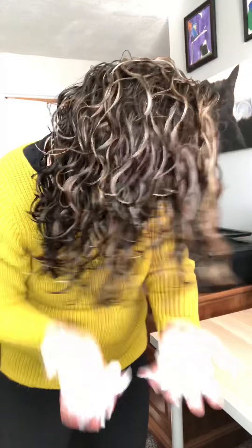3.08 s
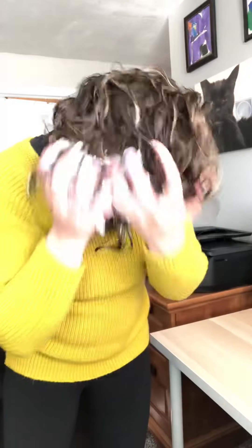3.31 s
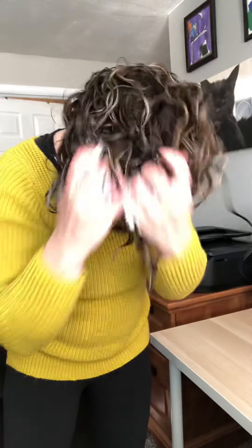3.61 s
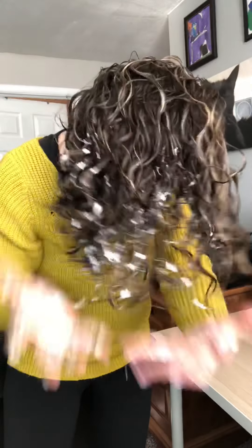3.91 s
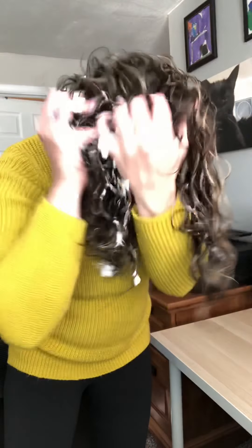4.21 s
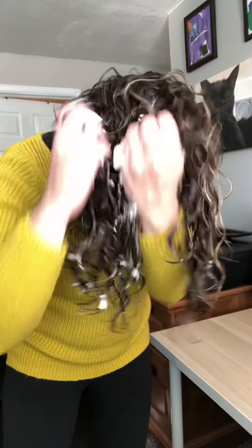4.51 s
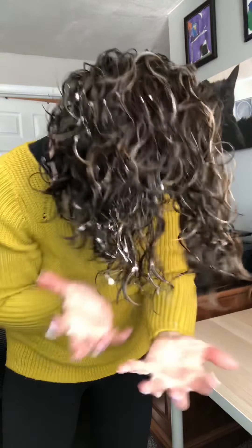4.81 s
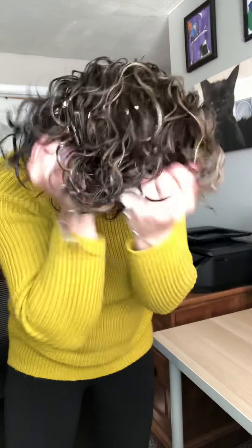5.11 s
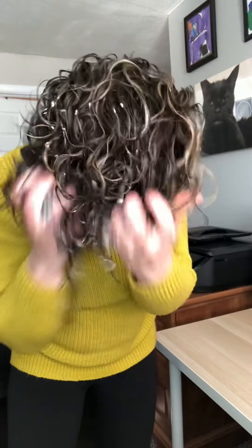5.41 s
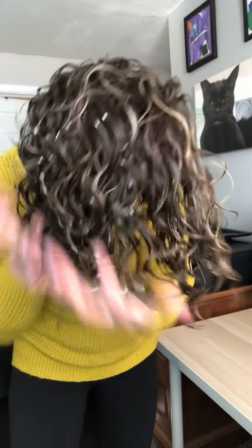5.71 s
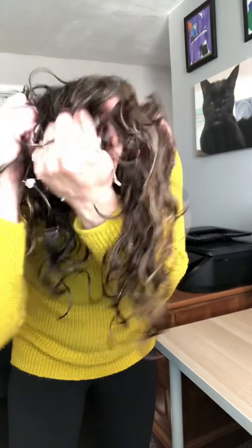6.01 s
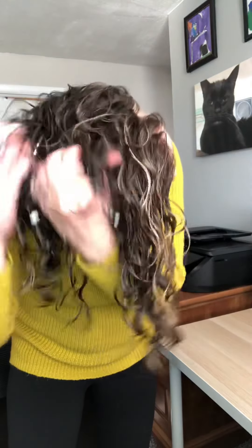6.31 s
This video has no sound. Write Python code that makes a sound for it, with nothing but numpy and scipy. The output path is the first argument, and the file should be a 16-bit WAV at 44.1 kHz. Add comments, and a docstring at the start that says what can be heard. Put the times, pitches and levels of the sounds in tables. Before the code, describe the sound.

A can of mousse lands on a wooden desk with a sharp knock, then rocks on its rim in a few softer, quickening thuds. Foamy palms rub together quietly with small bubble pops. The hands then scrunch wet hair several times, making soft rustling, squishing and fizzing. Sleeves flap faintly. The microphone is nearby, in a small room with a low, steady hush.

```python
"""A can of mousse is set down hard on a desk in a small room and rocks on its rim until it settles.
Each impact excites the damped modes of the desk, the can's thin wall and the room. Foamy palms then
rub together and scrunch wet curls four times: friction makes the strands rustle, pressure makes the
foam squelch and spurt between the fingers, and bursting bubbles ring briefly.
Sleeves flap softly over a quiet room hush."""
import sys
import numpy as np
from scipy import signal
from scipy.fft import rfft, irfft, next_fast_len
from scipy.io import wavfile

SR = 44100
rng = np.random.default_rng(int(sys.argv[2]) if len(sys.argv) > 2 else 0)


def file_out(sig):
    """Save sig as 16-bit WAV at sys.argv[1]."""
    # one column per channel
    cols = np.atleast_2d(sig).T
    # limit, then scale
    lim = np.clip(cols, -1, 1)
    pcm = np.round(lim * 32767).astype(np.int16)
    wavfile.write(sys.argv[1], SR, pcm)


N = 288855
T = np.arange(N) / SR


def from_db(db):
    """Amplitude ratio: a factor of ten for every 20 dB."""
    return 10 ** (np.asarray(db) / 20)


def rms_one(x):
    """Normalisation to unit mean power."""
    return x / np.sqrt(np.mean(x ** 2) + 1e-20)


def at_hz(points, hz):
    """Interpolation of a table on a log-frequency axis."""
    knots, values = np.transpose(points)
    return np.interp(np.log(np.maximum(hz, 1)), np.log(knots), values)


def coloured(x, spectrum):
    """Minimum-phase filtering to the given spectrum, at unit power gain."""
    size = 2 * next_fast_len(len(x) // 2 + 4096)
    hz = np.arange(size // 2 + 1) * SR / size
    gain = rms_one(from_db(at_hz(spectrum, hz)))
    cepstrum = irfft(np.log(gain))
    cepstrum[1:size // 2] *= 2   # folding onto positive time makes the filter causal
    cepstrum[size // 2 + 1:] = 0
    return irfft(rfft(x, size) * np.exp(rfft(cepstrum)))[:len(x)]


def drift(per_s):
    """Random modulation of unit power, joining per_s values a second."""
    return rms_one(np.interp(T * per_s, np.arange(4096), rng.standard_normal(4096)))


def click(s, db):
    """An ideal impulse excites all frequencies equally."""
    return from_db(db) * (np.arange(N) == round(s * SR))


def softened(x, hz):
    """Contact compliance spreads an impulse in time: a one-pole low-pass."""
    pole = np.exp(-2 * np.pi * hz / SR)
    return signal.lfilter([1 - pole], [1, -pole], x + 1e-18)


def ring(x, hz, t60):
    """Damped oscillator: a unit impulse starts a decaying sine of height 1."""
    decay, angle = from_db(-60 / (t60 * SR)), 2 * np.pi * hz / SR
    return signal.lfilter([0, np.sin(angle)], [1, -2 * decay * np.cos(angle), decay * decay], x + 1e-18)


def swelling_ring(x, hz, t60):
    """Two resonators in cascade: the impulse response builds to height 1 before it decays."""
    return ring(ring(x, hz, t60), hz, t60) * 2 * np.e * np.log(1000) / (t60 * SR)


def grains(gain, per_s, spread_db, clump_db):
    """Shot noise: clumps of uneven snaps, both denser and louder under greater pressure."""
    chance = np.clip(per_s / SR * np.sqrt(gain / gain.max()), 1e-4, 1)
    sizes = from_db(spread_db * np.minimum(rng.exponential(1, N), 4))
    signs = rng.choice([-1, 1], N)
    snaps = rms_one(sizes * signs) * (rng.random(N) < chance) / np.sqrt(chance)
    clumps = rms_one(from_db(clump_db * drift(per_s=140)))
    return gain * snaps * clumps


def room(x, wet_db, build_s):
    """Reverberation: dense reflections follow the direct sound and decay sooner in the treble."""
    # Reverberation time of the room. Each row: frequency in Hz, t60 in seconds.
    decay_times = [(100, .33), (500, 0.37), (2000, .31), (5000, 0.22), (8000, .2), (14000, 0.2)]
    t = T[:SR // 2]
    white = rfft(rng.standard_normal(len(t)))
    hz = np.arange(len(white)) * SR / len(t)
    edges = np.geomspace(100, 20000, 12)
    tail = 0
    for low, high in zip(edges, edges[1:]):
        band = irfft(white * ((hz >= low) & (hz < high)), len(t))
        t60 = at_hz(decay_times, np.sqrt(low * high))
        tail = tail + band * from_db(-60 * t / t60)
    tail *= 1 - np.exp(-t / build_s)
    return x + from_db(wet_db) * signal.fftconvolve(x, tail / np.linalg.norm(tail))[:N]


def room_hush():
    """Stationary noise, strongest in the bass, forms the ambient floor."""
    # Spectrum of the hush. Each row: frequency in Hz, relative density in dB.
    spectrum = [(25, -27.5), (55, 1), (90, -4), (135, 2.5), (200, -4), (300, -1.5), (480, -9), (650, -9),
                (1100, -16.5), (2500, -19.5), (7400, -22.5), (8600, -27.5), (16000, -30)]
    return from_db(-66) * coloured(rng.standard_normal(N), spectrum)


def sleeves():
    """Air displacement: loose knit pushes out a dull puff at each swing of the arms."""
    # Flaps of the sleeves. Each row: centre in seconds, level in dB, Gaussian width in seconds.
    flaps = [(1.652, -61, .02), (2.273, -60, 0.039), (2.437, -63, 0.026), (3.33, -66.5, 0.1),
             (4.191, -67, 0.018), (4.845, -61, 0.01), (5.562, -60.5, 0.0096), (5.66, -68, 0.059),
             (6.399, -68.5, 0.034)]
    # Spectrum of a puff. Each row: frequency in Hz, relative density in dB.
    spectrum = [(60, -9), (150, -17), (300, 3), (420, -5), (700, -19.5), (2000, -52)]
    swell = sum(from_db(db) * np.exp(-.5 * ((T - s) / width) ** 2) for s, db, width in flaps)
    return swell * coloured(rng.standard_normal(N), spectrum)


def bubble_pops(t60_cycles, crackle_db):
    """Bubble resonance: each burst rings for a few cycles and sets off its neighbours."""
    # Bubble clusters, sticky fingers letting go, and foam ringing in the cupped hollow of the hand in the
    # wettest presses. Each row: start in seconds, level in dB, pitch in Hz, crackle time constant in seconds.
    bursts = [(0.0384, -49.5, 2490, 0.0057), (0.093, -56.5, 1900, 0.0045), (0.126, -55.5, 2300, .002),
              (0.145, -59, 2180, 0.0046), (0.228, -59, 2430, 0.0024), (0.315, -60.5, 2900, 0.0015),
              (2.845, -57, 2510, 0.0025), (2.955, -49, 2360, 0.0069), (2.979, -50, 1900, 0.005),
              (3.122, -47.5, 4830, 0.0072), (3.15, -49, 6540, 0.0059), (3.16, -50, 3520, 0.023),
              (5.044, -49, 2250, 0.057), (5.08, -46.5, 3300, 0.032), (5.255, -57.5, 2350, 0.036),
              (5.165, -43.5, 4900, 0.00091), (6.0537, -48.5, 3580, 0.00043), (6.188, -59.5, 1300, 0.0043)]
    out = 0
    for s, db, hz, crackle_s in bursts:
        fade = (T > s) * np.exp(-np.minimum(abs(T - s) / crackle_s, 30))
        neighbours = from_db(crackle_db) * rng.standard_normal(N) * fade
        out = out + from_db(db) * swelling_ring(click(s, 0) + neighbours, hz, t60_cycles / hz)
    return out


def press(peak_s, swell_s, fade_s, roundness=1.53):
    """Pressure envelope, rising to a peak and easing off: roundness 1 is pointed, 2 a bell."""
    distance = np.maximum((peak_s - T) / swell_s, (T - peak_s) / fade_s)
    return np.exp(-np.minimum(distance, 10) ** roundness)


def slide(start_s, end_s, db, growth_db_per_s, attack_s=0.0068, release_s=0.012):
    """Friction envelope: it sets in at the touch, grows or wanes, and dies when contact ends."""
    contact_s = np.clip(T, start_s, end_s) - start_s
    outside = np.maximum(start_s - T, 0) / attack_s + np.maximum(T - end_s, 0) / release_s
    return from_db(db + growth_db_per_s * contact_s) * np.exp(-np.minimum(outside, 20))


def hand_work():
    """Compression and friction set the envelopes of squish, rustle and spurt."""
    # Presses, palm on palm and then in the curls.
    # Each row: peak in seconds, rustle in dB, squish in dB, swell in seconds, fade in seconds.
    presses = [(1.26, -71, -71, .015, .015), (1.44, -69, -70, 0.087, 0.13),
               (2.07, -71.5, -73.5, 0.13, 0.085), (2.23, -62, -64, 0.023, 0.055),
               (2.48, -60, -59.5, 0.058, 0.023), (2.604, -60, -59, 0.072, 0.028),
               (2.81, -69, -72, 0.13, 0.053), (2.965, -60, -57.5, 0.065, .035),
               (3.165, -59, -70.5, 0.034, 0.046), (3.361, -52.5, -49.5, 0.047, 0.046),
               (3.53, -64.5, -62.5, 0.059, 0.05), (4.29, -64.5, -59, 0.06, 0.04),
               (4.434, -67.5, -66.5, 0.052, 0.031), (5.07, -54, -48, 0.037, 0.066),
               (5.26, -69.5, -58.5, 0.027, 0.045), (5.46, -68, -84, 0.028, .02),
               (5.87, -76.5, -65.5, 0.075, 0.066), (6.03, -66.5, -66.5, 0.11, 0.051),
               (6.18, -66, -66.5, 0.032, 0.063), (6.485, -73, -77, .015, .025)]
    # Curls slide through the fingers, once up and once down per scrunch.
    # Each row: start in seconds, end in seconds, rustle in dB, growth in dB per second.
    slides = [(3.121, 3.373, -61.5, -7), (3.51, 3.731, -65, 1), (3.96, 4.308, -69.5, 21.5),
              (4.414, 4.62, -69, -7), (4.86, 5.16, -68.5, -1), (5.237, 5.48, -69.5, -18),
              (5.64, 6.06, -73, 6), (6.16, 6.538, -76, -20)]
    rustle = sum(slide(*row) for row in slides)
    squish = from_db(-12) * rustle   # foam on the sliding strands
    # The hardest clench adds a squirt of foam between the fingers.
    spurt = squish + from_db(-50) * press(peak_s=5.146, swell_s=0.023, fade_s=0.023)
    for s, rustle_db, squish_db, swell_s, fade_s in presses:
        pressure = press(s, swell_s, fade_s)
        squish = squish + from_db(squish_db) * pressure
        rustle = rustle + from_db(rustle_db) * pressure
    return squish, rustle, spurt


def scrunching():
    """Filtered shot noise: wet foam crackles low, strands crackle high, escaping foam fizzes on top."""
    # Spectra of foam, strands and fizz. Each row: frequency in Hz, relative density in dB.
    foam_spectrum = [(300, -27), (700, -16), (950, -4), (1150, -5), (1450, 0), (1750, -2.5), (2200, 1.5),
                     (2800, -4), (3500, -1), (4500, -4.5), (8000, -40.5)]
    strand_spectrum = [(500, -12.5), (1200, -7.5), (2400, -10.5), (3500, -1.5), (5000, 2), (7400, -2),
                       (8800, -8), (12000, -17), (16000, -20.5)]
    fizz_spectrum = [(2000, -37.5), (5000, -7), (8000, -8.5), (11000, -3.5), (13000, -9), (16000, -17)]
    squish, rustle, spurt = hand_work()
    foam = coloured(grains(squish, per_s=3500, spread_db=-0.5, clump_db=2), foam_spectrum)
    strands = coloured(grains(rustle, per_s=8000, spread_db=1.5, clump_db=1), strand_spectrum)
    fizz = coloured(grains(spurt, per_s=10000, spread_db=2.5, clump_db=2), fizz_spectrum)
    return from_db(-2) * foam + from_db(-3.22) * strands + from_db(-0.5) * fizz


def can_on_desk():
    """Modal response to impact: hard blows excite a wide band, gentle rocking mainly the low modes."""
    # Impacts of the can. Each row: time in seconds, thump in dB, contact cutoff in Hz, rim click in dB.
    blows = [(.508, -13, 2480, 1), (0.5107, 1, 1500, -13), (.5263, -11, 1040, -15), (0.7323, -27, 230, -37),
             (0.8183, -33.5, 230, -48), (0.8912, -24, 552, -23.5), (0.9419, -23, 278, -26.5),
             (0.983, -22, 280, -27.5), (1.0133, -26, 220, -48), (1.044, -22.5, 150, -50)]
    # Modes of the loaded desk, the can's metal wall and the room's lowest standing waves.
    # Each row: frequency in Hz, gain in dB, t60 in seconds.
    desk_modes = [(168, -31, 0.2), (199.4, -17, .21), (252, -16.5, 0.074), (267.8, -23, 0.21),
                  (304, -24, 0.13), (384, -24.5, 0.13), (529, -28, .22), (554, -11.5, .05),
                  (602, -22, 0.12), (728.4, -28, .18), (827, -30, .17), (920, -35, .16), (970, -32, 0.14),
                  (1044, -34, .17), (1109, -33, 0.21)]
    wall_modes = [(1636, -40.5, .16), (1775, -35.5, 0.069), (1846, -38, .18), (2322, -41, 0.11),
                  (2560, -41, 0.1), (2806, -33, .06), (3150, -33.5, .05)]
    room_modes = [(68.3, -32, 0.14), (86, -42, 0.18), (115.7, -43.5, 0.26), (131.5, -45, .18)]
    # Spectrum of the rim's click. Each row: frequency in Hz, relative density in dB.
    click_spectrum = [(150, -21.5), (400, -2), (800, -1), (1400, -3.5), (2000, -3), (3200, -10.5),
                      (4100, -14.5), (5600, -19), (7600, -20.5), (8500, -32.5), (16000, -44)]
    push, rim = 0, 0
    for s, thump_db, cutoff_hz, click_db in blows:
        push = push + softened(click(s, thump_db), cutoff_hz)
        rim = rim + softened(click(s, click_db), 4 * cutoff_hz)   # the rim is harder than the base
    # The rim rolls over the wood between the touches.
    rolling = slide(start_s=0.8, end_s=1.01, db=-68, growth_db_per_s=12)
    grind = grains(rolling, per_s=3400, spread_db=5, clump_db=2)
    push = push + from_db(-2.5) * softened(grind, hz=300)
    desk = sum(ring(push, hz, t60) * from_db(db) for hz, db, t60 in desk_modes)
    # A small desktop radiates the bass poorly.
    desk = signal.sosfilt(signal.butter(3, 130, "high", fs=SR, output="sos"), desk)
    wall = sum(ring(rim, hz, t60) * from_db(db) for hz, db, t60 in wall_modes)
    boom = sum(swelling_ring(push, hz, t60) * from_db(db) for hz, db, t60 in room_modes)
    crack = from_db(-3.5) * coloured(rim + grind, click_spectrum)
    return room(desk + wall, wet_db=-15, build_s=0.0082) + boom + room(crack, wet_db=-1, build_s=0.0033)


def scene():
    """Superposition: can, hands and sleeves add to the steady hush of one small room."""
    hands = scrunching() + bubble_pops(t60_cycles=5.8, crackle_db=-17)
    hands = room(hands, wet_db=-11, build_s=.004)
    hush = room_hush()
    return (can_on_desk() + hands + sleeves() + hush)[None]


def record(dry):
    """Band limiting and soft saturation: the microphone drops deep bass and top treble, rounds peaks."""
    bass_cut_hz, treble_cut_hz, ceiling = 45, 15900, .6
    thin = signal.sosfilt(signal.butter(4, bass_cut_hz, "high", fs=SR, output="sos"), dry)
    rounded = ceiling * np.tanh(thin / ceiling)
    return signal.sosfilt(signal.ellip(10, .2, 70, treble_cut_hz, fs=SR, output="sos"), rounded)


dry = scene()
out = record(dry)
file_out(out)
```